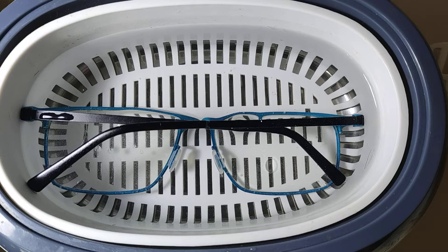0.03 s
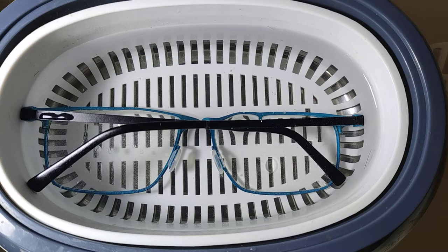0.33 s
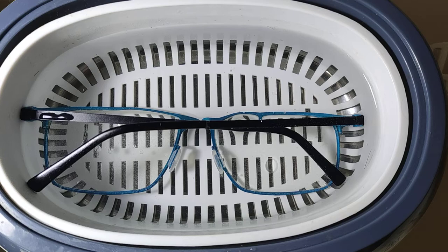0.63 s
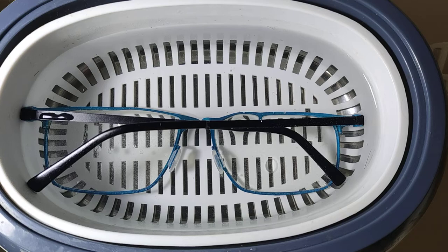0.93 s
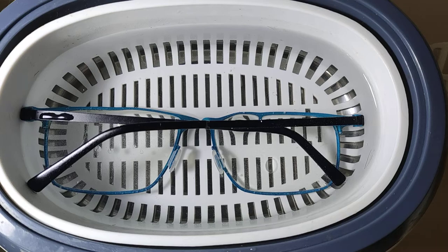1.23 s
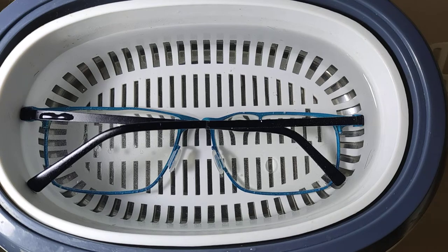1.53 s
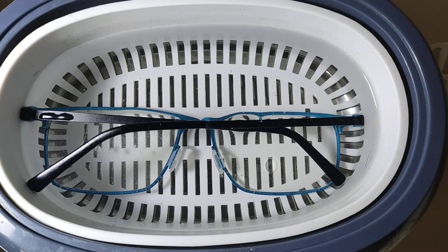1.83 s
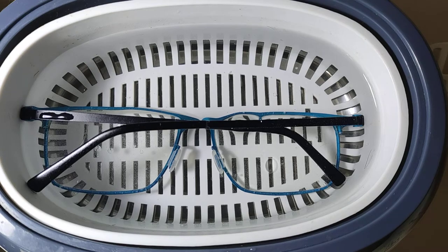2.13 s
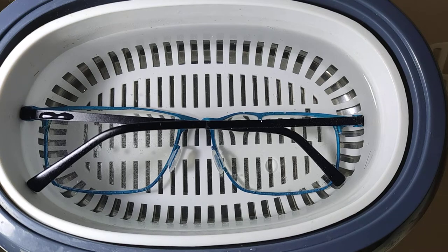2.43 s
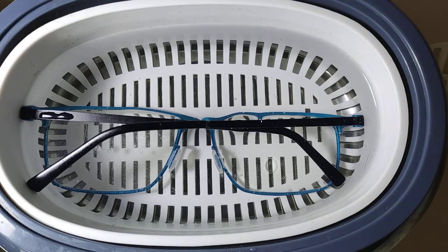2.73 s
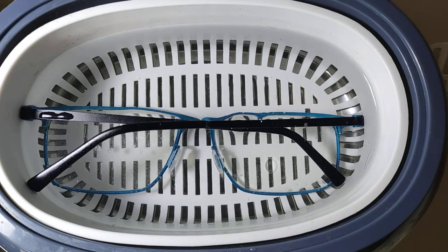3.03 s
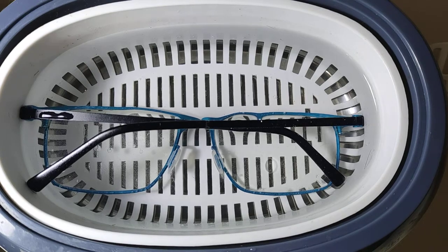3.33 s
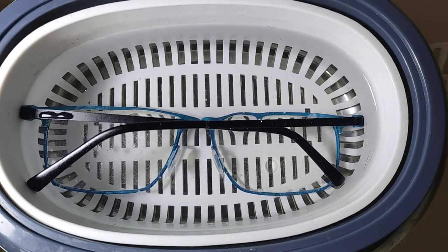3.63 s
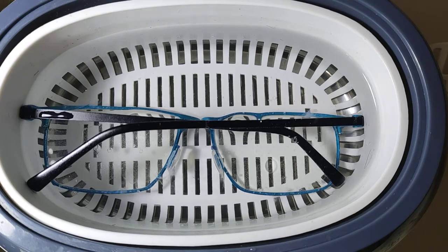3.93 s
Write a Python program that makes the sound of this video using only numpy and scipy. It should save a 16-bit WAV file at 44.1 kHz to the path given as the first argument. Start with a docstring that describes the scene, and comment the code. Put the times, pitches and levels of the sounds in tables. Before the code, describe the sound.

An ultrasonic cleaning bath starts up close by in a quiet room, following faint rustling, light taps on plastic and a click. Its harsh, low buzz holds steady, mostly on the right, while the water's hiss grows airy whistles.

```python
"""A soft rustle and a few finger taps in a quiet room, then a switch snaps on a small ultrasonic cleaner.
Its transducer fires one burst per mains cycle, and the water answers with pulsing cavitation hiss
that grows three airy whistles. The ultrasound overloads the right microphone, which rectifies
each burst into a harsh low buzz."""
import sys
import numpy as np
from scipy import signal
from scipy.fft import rfft, irfft, next_fast_len
from scipy.io import wavfile
from scipy.ndimage import uniform_filter1d, map_coordinates

SR = 44100
rng = np.random.default_rng(int(sys.argv[2]) if len(sys.argv) > 2 else 0)


def put_to_file(sound):
    """Save the sound as 16-bit audio at rate SR, in the file named by the first command-line argument."""
    columns = np.atleast_2d(sound).T  # one column per channel
    safe = np.clip(columns, -1, 1)
    whole_steps = np.round(safe * 32767)
    wavfile.write(sys.argv[1], SR, whole_steps.astype(np.int16))


N = 176400

MAINS_HZ, POWER_ON_S = 49.93, 1.6262
BURST_MS, SWELL_MS = (2.56, 10.16), (4.2, 6.92)  # start and end within a cycle
SPIKE_MS, SPIKE_WIDTH_MS, SPIKE_GAIN = (8.55, 9.24), (0.25, 0.15), (0.72, 0.88)
LAST_SPIKE_MS, TROUGH_MS = 9.87, (8.15, 8.9)
NASAL_HZ, NASAL_PEAK_S, NASAL_SPREAD_S = 1520, 2.7, 0.31
CHURN_FROM_S, CHURN_DB = 2.75, 2
WHISTLE_FROM_S, WHISTLE_GROW_S = 1.78, 0.8
FLUTTER_HZ, FLUTTER_PEAK_S, FLUTTER_WIDTH_MS = 43.775, 0.0034, 2.6
SWITCH_T60_S, TAP_T60_S, RUSTLE_TOP_HZ = 0.091, 0.08, 12300
ROOM_DB, HUSH_DB, HUSH_END_S = -54, -40.5, 0.385
MIC_LOW_HZ, TOP_HZ = 13.6, 15850

# Rectified pressure in a burst: t/s, relative heights of swell, first spike, second spike
BURST_HEIGHTS = [(1.63, -0.063, 0.13, 0.13), (1.652, 0.41, 0.036, 0.14), (1.675, 0.17, 0, 0.29),
                 (1.79, 0.54, 0.2, 0.23), (2.0, 0.22, 0.42, 0.19), (2.1, 0.54, 0.71, 0.31),
                 (2.3, 0.059, 0.29, 0.68), (2.55, -0.14, 0.34, 0.74), (2.8, 0.093, 0.33, 0.61),
                 (3.0, 0.19, -0.055, 0.73), (3.1, 0.12, 0.091, 0.38), (3.3, 0.012, 0, 0.38),
                 (3.42, 0.37, 0, 0.87), (3.52, 0.22, 0.032, 0.92), (3.79, 0.53, 0.024, 0.68),
                 (4.0, 0.12, 0, 0.83)]
# EQ of the steady ripple and of the splutter on the buzz: f/Hz, level/dB
RIPPLE_EQ = [(100, 9), (400, 4), (800, 2.5), (1100, -6.5), (1600, -4), (2700, -4), (4000, -13.5),
             (6000, -8), (9000, -20)]
SPLUTTER_EQ = [(60, 7.5), (400, 5), (1000, -6.5), (2500, -22.5), (5000, -12.5), (9000, -12.5)]
# Fader ride of the cavitation hiss: t/s, left and right relative level/dB
HISS_RIDE = [(1.63, -33.5, -28), (1.75, -23, -22), (1.9, -31, -23), (2.07, -25.5, -20.5),
             (2.5, -23.5, -21.5), (2.9, -24.5, -21.5), (3.25, -20.0, -21.5), (3.5, -23.0, -22.5),
             (3.7, -26.5, -20.5), (3.84, -23.5, -19.5), (4.0, -24, -21)]
# Hiss EQ on each side: f/Hz, level/dB
HISS_LEFT_EQ = [(40, -9), (200, 0), (900, -3), (2500, -0.5), (6500, 1.5), (8500, 0.5), (11500, 6.5),
                (13000, 3.5), (15500, 0.5)]
HISS_RIGHT_EQ = [(40, -21), (900, 5), (2500, 3.5), (5000, 2), (8200, -3.5), (11500, 0), (13000, -6),
                 (15500, 0)]
# Hiss envelope, left row then right: start/ms, end/ms, attack/ms, tail/ms, floor level/dB
HISS_ENVELOPES = [(3.4, 9.5, 0.59, 2.4, -39), (2.29, 9.56, 0.05, 0.7, -12)]
# Narrow bands of the bath: settled f/Hz, share of the glide, width/Hz, left and right relative level/dB
WHISTLE_BANDS = [(5387, 0, 960, -3, 1.5), (10240, 1, 850, 0.5, -2), (15200, 0, 1400, 2, 3.5)]
# Glide as the water shifts, applied as an offset from its last value: t/s, f/Hz
WHISTLE_GLIDE = [(2.3, 11730), (2.55, 11230), (2.7, 10700), (2.92, 10450), (3.3, 10770), (4, 10540)]
# Switch contacts: t/s, level/dB
SWITCH_CLICKS = [(1.6123, -27), (1.6178, -23.5)]
# Fingers on the case: t/s, tick level/dB, thud level/dB
FINGER_TAPS = [(1.0605, -60, -48), (1.4184, -56.5, -74), (1.5464, -69.5, -68), (1.5763, -60, -62)]
# Fader ride of the rustle: t/s, level/dB
RUSTLE_RIDE = [(.385, -67), (.53, -65), (.58, -59), (.72, -58), (.79, -63.5), (1.05, -66), (1.25, -78),
               (1.6, -92)]
# EQ of switch, tap tick, tap thud, rustle and room tone: f/Hz, level/dB
SWITCH_EQ = [(100, -5), (500, 0), (3000, -3.5), (8000, -1.5), (15000, -4)]
TICK_EQ = [(300, -8), (1800, -3), (3200, 3), (4300, -3), (5500, -1), (7500, -6), (9500, 0), (15000, -14)]
THUD_EQ = [(60, -1), (200, 2), (600, -11), (2500, -26), (8000, -50)]
RUSTLE_EQ = [(500, -10), (1200, -2.5), (3500, -4.5), (9000, -3), (11800, -2.5)]
ROOM_EQ = [(15, -33), (25, -0.5), (73, -2), (93, -26), (140, -16), (156, -33), (193, -14), (313, -15.5),
           (495, -21), (826, -29.5), (997, -37.5), (15500, -46)]
# Stereo image of the room tone: f/Hz, left-right correlation
ROOM_CORRELATION = [(60, 0.87), (240, 0.86), (950, 0.17), (3770, .01)]


def buzz():
    """The microphone rectifies each ultrasound burst into a ledge of pressure, a swell, spikes and grit."""
    t, ms = clock(), cycle_ms(MAINS_HZ, POWER_ON_S)
    swell, *heights = curves(BURST_HEIGHTS)
    gate = step(ms - BURST_MS[0], edge=0.013) * step(BURST_MS[1] - ms, edge=0.074)
    hump = step(ms - SWELL_MS[0], edge=0.56) * step(SWELL_MS[1] - ms, edge=0.27)
    churn = amp(CHURN_DB * np.tanh((t - CHURN_FROM_S) / 0.27))
    surge = 0.088 * churn * wobble(rate=40) * amp(7.3 * (swell - 0.43))  # varies from burst to burst
    body = 0.074 * gate + hump * (1.26 * swell + surge - 0.06)
    # Once the water churns, splutter takes over from the steady ripple.
    grit = amp(-18.5) / churn * ripple(rate=7) + amp(-21) * churn * noise(SPLUTTER_EQ)[0]
    grit *= gate * amp(10 * (swell - 0.3255))
    pressure = (body + spikes(ms, heights) + grit) * (t > POWER_ON_S)
    drift = 0.052 * wobble(rate=22) * np.clip((t - POWER_ON_S) / 0.017, 0, 1)
    return drift + filtered(pressure, lambda hz: 1j * hz / (MIC_LOW_HZ + 1j * hz))  # low cut


def spikes(ms, heights):
    """The bite of the buzz: three pressure spikes end each burst and, for a while, ring nasally."""
    peaks = sum(gain * height * amp(wobble(rate=36)) * bell(ms - at, width)
                for height, at, width, gain in zip(heights, SPIKE_MS, SPIKE_WIDTH_MS, SPIKE_GAIN))
    peaks += 0.26 * heights[1] * bell(ms - LAST_SPIKE_MS, SPIKE_WIDTH_MS[1])
    sag = 0.15 * heights[0] * sum(bell(ms - at, width=0.35) for at in TROUGH_MS)
    nasal = 0.083 * bell(clock() - NASAL_PEAK_S, NASAL_SPREAD_S) * bell(ms - SPIKE_MS[0], width=1.06)
    phase = 2 * np.pi * NASAL_HZ * (ms - SPIKE_MS[1]) / 1000
    return peaks - sag + nasal * np.cos(phase)


def ripple(rate):
    """Fine grain that repeats every mains cycle and morphs, rate times a second, as the water moves."""
    grains = rng.standard_normal((64, int(SR / MAINS_HZ)))
    place = (clock() - POWER_ON_S) % (1 / MAINS_HZ) * SR
    pattern = map_coordinates(grains, [clock() * rate, place], order=2, mode="mirror")
    return unit(filtered(pattern, lambda hz: amp(along(RIPPLE_EQ, hz))))


def cavitation():
    """The water hisses in bursts at the mains rate, over a weaker, slower flutter."""
    ms = cycle_ms(MAINS_HZ, POWER_ON_S)
    off_beat_ms = cycle_ms(FLUTTER_HZ, FLUTTER_PEAK_S - 0.5 / FLUTTER_HZ) - 500 / FLUTTER_HZ
    flutter = amp(-10 + 2.5 * wobble(rate=30)) * bell(off_beat_ms, FLUTTER_WIDTH_MS)
    fade_in = np.clip((clock() - WHISTLE_FROM_S) / WHISTLE_GROW_S, 0, 1)
    sides = []
    for side, (eq, ride_db) in enumerate(zip((HISS_LEFT_EQ, HISS_RIGHT_EQ), curves(HISS_RIDE))):
        start, end, attack, tail, floor_db = HISS_ENVELOPES[side]
        burst = step(ms - start, attack) * np.exp(-np.maximum(ms - end, 0) / tail)
        burst *= amp(3 * wobble(rate=50) + 1.94 * wobble(rate=450))
        envelope = unit(np.sqrt(burst ** 2 + flutter ** 2 + amp(floor_db) ** 2))
        hiss = amp(-1) * fade_in * whistles(side) + amp(3 - 1.55 * fade_in) * noise(eq)[0]
        sides.append(shimmer(hiss, depth_db=3.5) * envelope * amp(ride_db + 1))
    return np.array(sides) * (clock() > POWER_ON_S)


def whistles(side):
    """Three airy bands of the bath; the middle one slides down as the water shifts."""
    glide_hz, = curves(WHISTLE_GLIDE)
    bend_hz = glide_hz - glide_hz[-1]
    return unit(sum(band(hz + share * bend_hz, width_hz) * amp(db[side] + 1.4 * wobble(rate=9))
                    for hz, share, width_hz, *db in WHISTLE_BANDS))


def switch():
    """The contacts snap shut in two quick clicks."""
    return sum(knock(s, db, SWITCH_EQ, SWITCH_T60_S) for s, db in SWITCH_CLICKS)


def taps():
    """Fingers hit the plastic case: a wide tick over a mono thud."""
    return sum(knock(s, tick_db, TICK_EQ, TAP_T60_S) + knock(s, thud_db, THUD_EQ, TAP_T60_S)[0]
               for s, tick_db, thud_db in FINGER_TAPS)


def rustle():
    """Soft, bright handling noise that swells and dies away before the switch."""
    air = filtered(noise(RUSTLE_EQ, channels=2), lambda hz: 1 / np.sqrt(1 + (hz / RUSTLE_TOP_HZ) ** 12))
    return air * amp(curves(RUSTLE_RIDE)[0] + 0.99 * wobble(rate=60)) * (clock() > HUSH_END_S)


def room_tone():
    """A low bed, nearly mono in the bass, that comes in after a hush."""
    spread = lambda hz: np.arccos(along(ROOM_CORRELATION, hz)) / 2
    bed = noise(ROOM_EQ, channels=2)
    mid, side = filtered(bed, lambda hz: np.array([np.cos(spread(hz)), np.sin(spread(hz))]))
    level_db = ROOM_DB + HUSH_DB * step(HUSH_END_S - clock(), edge=0.0011)
    return unit(np.array([mid + side, mid - side])) * amp(level_db)


def knock(s, db, eq, t60):
    """A short, dying puff of stereo noise."""
    age = clock() - s
    return noise(eq, channels=2) * (age > 0) * amp(db - 60 * np.abs(age) / t60)


def shimmer(x, depth_db):
    """Brief, narrow patches of random gain; comes out at rms 1."""
    spectra = signal.stft(x, nperseg=512)[2]
    patches = uniform_filter1d(rng.standard_normal(spectra.shape), size=3, axis=0)
    patches = uniform_filter1d(patches, size=7, axis=1)
    return unit(signal.istft(spectra * amp(depth_db * unit(patches)), nperseg=512)[1][:N])


def band(centre_hz, width_hz):
    """Narrow noise of rms 1 around a moving centre."""
    a, b = filtered(rng.standard_normal((2, N)), lambda hz: 1 / (1 + (1.5 * hz / width_hz) ** 2))
    phase = 2 * np.pi * np.cumsum(centre_hz) / SR
    return unit(a * np.cos(phase) + b * np.sin(phase))


def noise(eq, channels=1):
    """Coloured noise of rms 1."""
    return unit(filtered(rng.standard_normal((channels, N)), lambda hz: amp(along(eq, hz))))


def filtered(x, response):
    """Play x through a frequency response."""
    size = next_fast_len(N + SR // 2)
    return irfft(rfft(x, size) * response(np.fft.rfftfreq(size, 1 / SR)), size)[..., :N]


def along(points, hz):
    """Read a curve on a log frequency axis."""
    knots_hz, values = np.transpose(points)
    return np.interp(np.log(hz + 1), np.log(knots_hz + 1), values)


def curves(rows):
    """One automation lane for each column after the time."""
    times, *columns = np.transpose(rows)
    return np.array([np.interp(clock(), times, column) for column in columns])


def wobble(rate):
    """Smooth random modulation, rate knots a second."""
    return map_coordinates(rng.standard_normal(2048), [clock() * rate], mode="mirror")


def step(x, edge):
    """A soft rise from 0 to 1 around x = 0."""
    return 0.5 + 0.5 * np.tanh(x / (2 * edge))


def bell(x, width):
    """A smooth bump at x = 0."""
    return np.exp(-(x / width) ** 2)


def cycle_ms(hz, start):
    """Milliseconds into the running cycle."""
    return (clock() - start) % (1 / hz) * 1000


def clock():
    """Seconds at each sample."""
    return np.arange(N) / SR


def amp(db):
    """Decibels to gain."""
    return 10 ** (np.asarray(db) / 20)


def unit(x):
    """Scale to rms 1."""
    return x / np.sqrt(np.mean(x ** 2) + 1e-20)


def scene():
    """The mix: room, handling and hiss on both sides, the buzz almost hard right."""
    return room_tone() + rustle() + taps() + switch() + cavitation() + buzz() * amp([[-34], [0]])


def record(dry):
    """The microphones soft-clip the highest peaks; a steep high cut follows."""
    clipped = dry / (1 + np.abs(dry) ** 6) ** (1 / 6)
    return filtered(clipped, lambda hz: step(TOP_HZ - hz, edge=15))


dry = scene()
out = record(dry)
put_to_file(out)
```